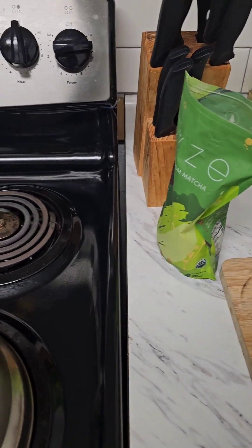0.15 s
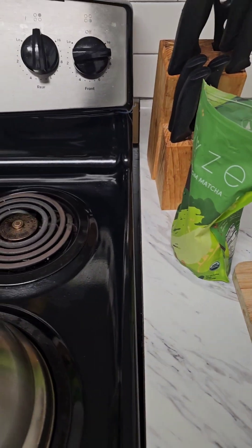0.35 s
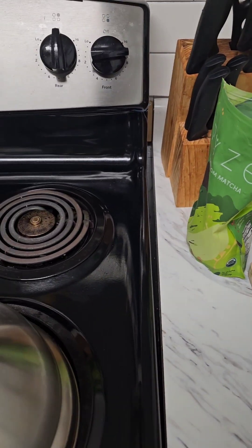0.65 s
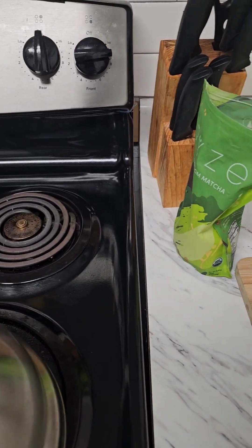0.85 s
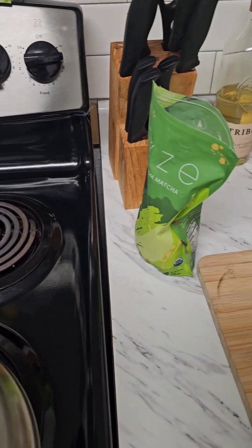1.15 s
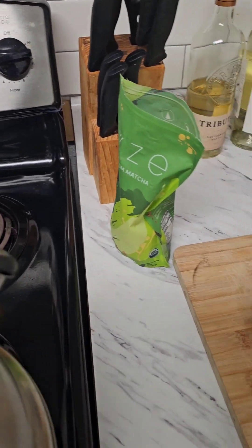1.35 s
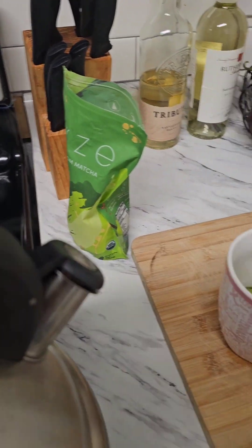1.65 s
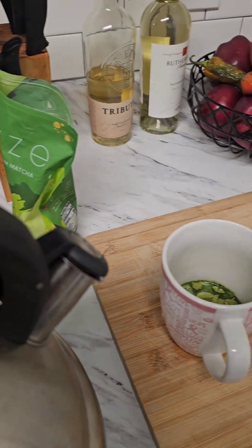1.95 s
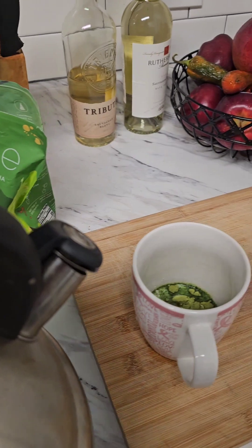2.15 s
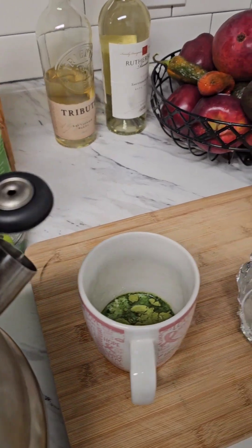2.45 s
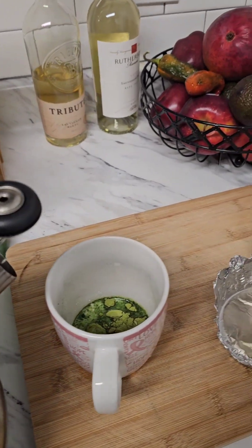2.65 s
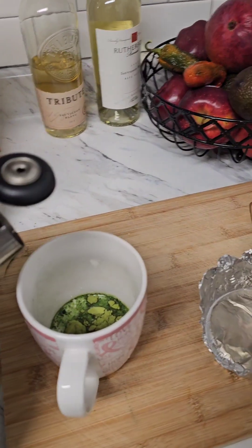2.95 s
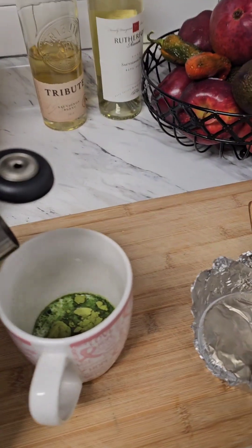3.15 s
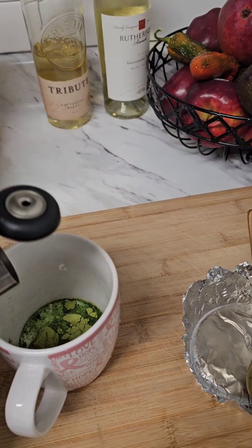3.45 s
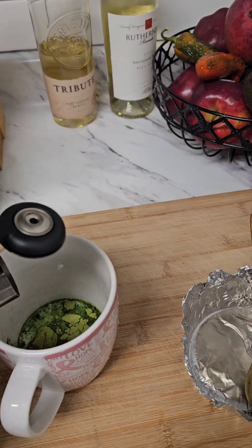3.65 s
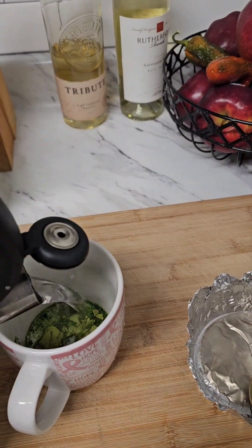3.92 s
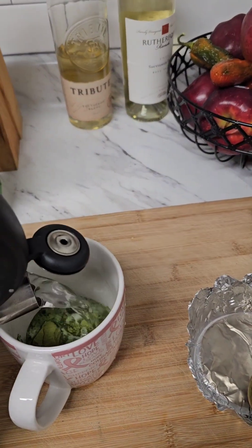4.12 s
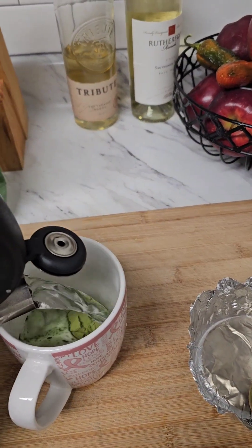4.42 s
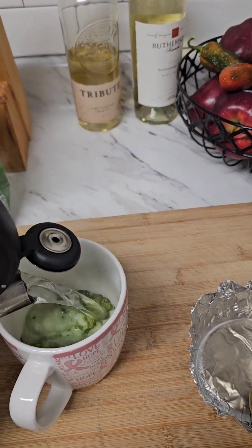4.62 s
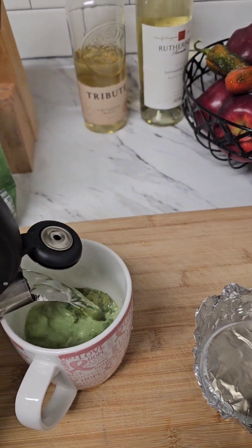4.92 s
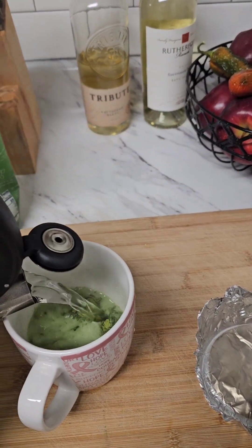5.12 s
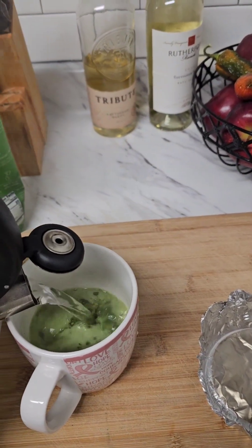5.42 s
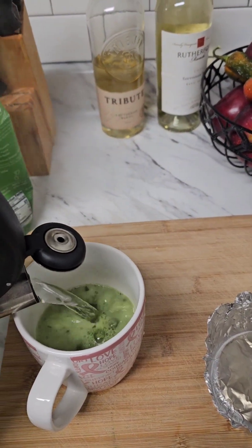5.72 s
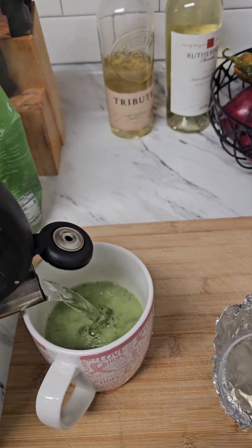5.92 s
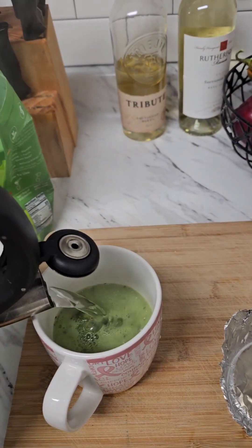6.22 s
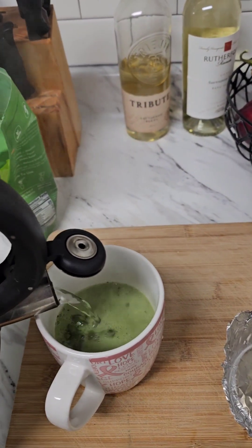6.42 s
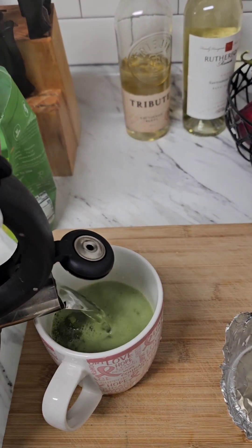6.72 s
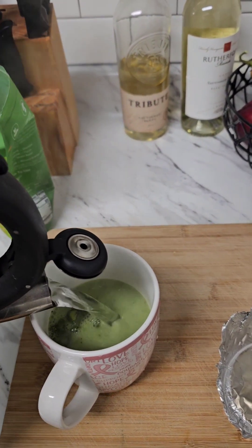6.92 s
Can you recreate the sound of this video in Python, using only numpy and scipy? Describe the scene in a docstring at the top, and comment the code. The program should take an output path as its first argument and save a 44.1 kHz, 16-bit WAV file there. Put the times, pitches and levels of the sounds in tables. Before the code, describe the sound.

A close stereo recording in a small, slightly reflective kitchen with faint low room noise. From 0 to 0.65 s a kettle whistles shrilly around 2.7 kHz with bright overtones, wobbling and breaking into fuzz over steam hiss and boiling rumble. From about 0.5 s, as it is lifted, the pitch sags, steam puffs, and the tone abruptly stops; a wet sputter slides down and vanishes by 0.95 s. The boil collapses to a soft simmer. Between 1.2 and 3.5 s water sloshes dully inside the kettle, while thin metallic burner ticks come irregularly from 1.4 s. At 2.26 s the spout cap cracks open sharply, rebounds and rings the kettle, with a short sizzle. After a lull, water enters the ceramic mug at 3.9 s with gulps and plinks. A dull, low knock lands at 4.2 s. The gentle pour burbles unevenly, its hollow resonance rising, softer toward 7 s.

```python
"""A kettle whistles at the boil in a small kitchen, then sputters out as it is lifted off the stove.
Steam is filtered noise; the whistle is sines that break up into fuzzy noise bands. As the rumble dies
away, water sloshes as short swelling tones with spits of noise, and a burner ticks as ringing metal.
The spout cap snaps open: sharp noise bursts, and the kettle rings. Then hot water runs into a mug with
splashes of noise bursts and chirping sines, a stream of chirping bubbles that ring the mug, and one
dull knock of low tones."""
import sys
import numpy as np
from scipy import signal
from scipy.fft import rfft, irfft, next_fast_len
from scipy.io import wavfile
from scipy.ndimage import uniform_filter1d

SR = 44100
rng = np.random.default_rng(int(sys.argv[2]) if len(sys.argv) > 2 else 0)


def inscribe(sig):
    """Save sig as 16-bit PCM at rate SR to the path in sys.argv[1].

    A 1-D sig is mono; a 2-D sig holds one channel per row.
    Samples are clipped to [-1, 1] before scaling.
    """
    pcm = np.round(np.clip(np.atleast_2d(sig).T, -1, 1) * 32767)
    wavfile.write(sys.argv[1], SR, pcm.astype(np.int16))


N = 311787
T = np.arange(N) / SR  # time of every sample in seconds


def amp(db):
    """Turns decibels into a plain factor."""
    return 10 ** (np.asarray(db) / 20)


def evened(x):
    """Scales a sound to an average (rms) strength of 1."""
    return x / np.sqrt(np.mean(x ** 2) + 1e-20)


def peaked(x, size=176):
    """Scales a blow so that its loudest few milliseconds have rms 1."""
    power = np.atleast_2d(x ** 2).mean(0)
    return x / np.sqrt(uniform_filter1d(power, size).max())


def curve(rows):
    """The columns of a table, joined by straight lines in time."""
    s, *columns = np.transpose(rows)
    return [np.interp(T, s, column) for column in columns]


def read(points, hz):
    """Reads a table of (Hz, value) at any frequency, evenly by musical pitch."""
    f, value = np.transpose(points)
    return np.interp(np.log(hz + 1), np.log(f + 1), value)


def add(mix, s, sound):
    """Adds a sound into the mix, starting at s seconds."""
    part = mix[..., round(s * SR):][..., :sound.shape[-1]]
    part += sound[..., :part.shape[-1]]


def pan(db):
    """Makes the left side louder than the right by db."""
    return amp([[db / 2], [-db / 2]])


def bump(s, half_s):
    """A smooth swell of height 1 around the time s."""
    return np.exp(-((T - s) / half_s) ** 2)


def since(s):
    """Seconds gone by after the time s, zero before."""
    return np.maximum(T - s, 0)


def wander(rate):
    """Smooth chance of rms 1 with this many turns a second."""
    steps = np.interp(T * rate, np.arange(N), rng.standard_normal(N))
    return evened(uniform_filter1d(steps, max(int(SR / rate), 1)))


def colour(x, points, size=4096):
    """A filter with the given spectrum that never sounds ahead of its input."""
    log_gain = read(points, abs(np.fft.fftfreq(size, 1 / SR))) * np.log(10) / 20
    taps = np.fft.ifft(np.exp(np.conj(signal.hilbert(log_gain)))).real[:size // 2]
    return signal.oaconvolve(x, taps[None], axes=1)[:, :x.shape[1]]


# How alike diffuse sound is on the left and right.
# Each row: frequency in Hz, likeness from 0 (unrelated) to 1 (the same).
LIKENESS = [(100, 0.93), (300, .9), (600, .55), (1200, 0), (4000, 0)]


def diffuse(size):
    """White noise on two sides: alike in the bass, unrelated in the treble."""
    a, b = rfft(rng.standard_normal((2, next_fast_len(2 * size) // 2 + 2)))
    same = np.clip(read(LIKENESS, np.linspace(0, SR / 2, len(a))), 0, 1)
    mid, side = a * np.sqrt((1 + same) / 2), b * np.sqrt((1 - same) / 2)
    return irfft([mid + side, mid - side])[:, :size]


def resonate(x, hz, width):
    """A steep resonance that follows hz: two equal stages, each with this width in Hz."""
    turn = np.exp(2j * np.pi * np.cumsum(hz * np.ones(N)) / SR)
    r = np.exp(-np.pi * width / SR)
    # shift the pitch down to zero, smooth, and shift back up
    smooth = signal.lfilter([(1 - r) ** 2], [1, -2 * r, r * r], x / turn)
    return (turn * smooth).real


def ring(modes):
    """Dying sines of a struck body, with the deep bass below about 65 Hz filtered away."""
    t = T[:SR // 2]
    sines = np.zeros(len(t))
    for k, (hz, db, t60) in enumerate(modes):
        sines += amp(db - 60 * t / t60) * np.sin(2 * np.pi * hz * t) * (-1) ** k
    return signal.sosfilt(signal.butter(2, 65, "high", fs=SR, output="sos"), sines)


# How long the kitchen's echoes last.
# Each row: frequency in Hz, time to fall by 60 dB in seconds.
ECHO_TIMES = [(100, 0.62), (300, 0.26), (1000, 0.052), (3000, 0.35), (7000, 0.19), (16000, 0.18)]


def room(x, wet_db, size=22050):
    """Direct sound plus the kitchen's reflections, each band dying at its own speed."""
    hz, t, bands = signal.stft(diffuse(size), SR, nperseg=256)
    fading = bands * amp(-60 * t / read(ECHO_TIMES, hz)[:, None])
    tail = signal.istft(fading, SR)[1][:, :size]
    tail *= np.clip((T[:size] - .002) / 0.001, 0, 1)  # no reflection in the first 2 ms
    wet = signal.fftconvolve(np.atleast_2d(x), tail / np.linalg.norm(tail[0]), axes=1)[:, :N]
    return (x + amp(wet_db) * wet) / np.sqrt(1 + amp(wet_db) ** 2)


def bubble(hz, cycles, rise, size=3000):
    """A bubble rings for some cycles and climbs in pitch as it nears the surface."""
    age = T[:size] * hz / cycles
    turns = np.cumsum(hz * (1 + rise * np.minimum(age, 4))) / SR
    return np.sin(2 * np.pi * turns) * np.exp(-age) * (1 - np.exp(-turns))


def gulp(hz):
    """A large bubble pinches off with a soft plop and rings."""
    t = T[:3000]
    burst = rng.standard_normal((1, len(t))) * np.exp(-t / 0.0045)
    plop = colour(burst, [(300, -8), (800, 1.5), (1800, -5), (4000, -20)])[0]
    return peaked(peaked(bubble(hz, cycles=4.6, rise=0.021)) + peaked(plop))


def fizz(low_hz, high_hz, per_s, spread_db, cycles, count=28):
    """A cloud of bubbles of many sizes, arriving in clumps."""
    out, clumps = np.zeros((2, N)), amp(5.5 * wander(40))
    sizes = amp(spread_db * np.minimum(rng.exponential(1, N), 3.5))
    angle = rng.random(N) * np.pi / 2  # each bubble has its own place between left and right
    places = sizes * np.array([np.cos(angle), np.sin(angle)])
    for hz in np.geomspace(low_hz, high_hz, count):
        births = rng.random(N) < clumps * per_s / count / SR
        out += signal.oaconvolve(births * places, bubble(hz, cycles, rise=0.025)[None], axes=1)[:, :N]
    return evened(out)


# Tone colour of the faint steady background noise.
# Each row: frequency in Hz, relative strength in dB per Hz.
BACKGROUND = [(25, -1.5), (60, 4), (110, -0.5), (300, -14), (600, -21), (1000, -18), (1700, -22),
              (2300, -29), (3500, -32), (8000, -36.5), (16000, -38)]


def background():
    """A faint, steady noise, strongest in the bass: filtered white noise."""
    return pan(.8) * amp(-65.5) * evened(colour(diffuse(N), BACKGROUND))


# Low rumble of collapsing bubbles.
# Each row: frequency in Hz, relative strength in dB per Hz.
RUMBLE_COLOUR = [(60, -14), (110, -5.5), (150, 4.5), (205, -6.5), (290, 5), (360, -9.5), (520, -5.5),
                 (800, -10.5), (1100, -37), (2200, -32), (4000, -47)]
# Sizzle of wet metal.
# Each row: frequency in Hz, relative strength in dB per Hz.
SIZZLE_COLOUR = [(500, -7.5), (1500, -5), (3000, 5), (4000, -5.5), (5200, -1.5), (6500, 2), (7800, 6),
                 (10000, -8.5), (11700, -3), (13000, -9), (16000, -17)]
# Resonances of the air in the kettle, stirred by steam.
# Each row: pitch in Hz, width in Hz, relative level in dB.
KETTLE_AIR = [(295, 13, -3.5), (476, 110, -6), (645, 110, -19.5), (916, 10, -15), (1330, 60, -16.5),
              (1434, 17, -15), (1640, 96, -17), (2140, 150, -14.5), (4070, 250, -19.5)]
# Steam flares up at the boil, as the cap opens and as tipped water meets the hot wall.
# Each row: time of the peak in seconds, rise in seconds, level in dB, later fade in dB per second.
STEAM_FLARES = [(.65, 1, -59.5, 7), (2.38, .06, -56.5, 58.5), (4.5, 0.65, -68.5, 12)]
LIFT_S, STOP_S = .48, .648  # the kettle leaves the heat; the jet lets go
ROLL_DB, EMBER_DB = -41.5, -52  # rumble of the rolling boil, and of the simmer left after it
SETTLE_DB_PER_S, COOL_DB_PER_S = 65.5, 5.5  # the boil collapses fast, the simmer dies slowly
PLOPS_DB, PLOPS_FADE_DB_PER_S = -63.5, 5.5  # bursting bubbles thin out off the heat
HOLLOW_DB, HOLLOW_FOLLOW = -31.5, 0.47  # the air hums at this level plus a share of the steam's dB


def simmer():
    """Collapsing bubbles rumble and plop in the cooling kettle; steam makes its air hum, and wet metal sizzles."""
    off_heat = since(STOP_S)
    rolling = amp(ROLL_DB - SETTLE_DB_PER_S * off_heat)
    embers = amp(EMBER_DB - COOL_DB_PER_S * off_heat)
    rumble = evened(colour(diffuse(N), RUMBLE_COLOUR)) * np.hypot(rolling, embers) * amp(2.2 * wander(40))

    flares = [amp(db - fade * since(s)) * np.where(T < s, bump(s, rise_s), 1)
              for s, rise_s, db, fade in STEAM_FLARES]
    steam_db = 20 * np.log10(np.linalg.norm(flares, axis=0) + 1e-9)
    crackling = diffuse(N) * amp(2 * wander(720))
    sizzle = evened(colour(crackling, SIZZLE_COLOUR)) * amp(steam_db + 0.58 * wander(32))

    drive = diffuse(N)
    hum = evened(sum(amp(db) * evened(resonate(drive, hz, width)) for hz, width, db in KETTLE_AIR))
    hollow = hum * amp(HOLLOW_DB + HOLLOW_FOLLOW * steam_db)

    plops = fizz(low_hz=780.0, high_hz=3830, per_s=680, spread_db=11.0, cycles=11, count=14)
    plops = plops * amp(PLOPS_DB - PLOPS_FADE_DB_PER_S * off_heat)
    return pan(-1.3) * rumble + pan(1.5) * hollow + pan(.8) * sizzle + room(plops, wet_db=1.5)


# Ticks of the cooling burner.
# Each row: time in seconds, level in dB before the common trim in burner().
BURNER_TICKS = [(1.3656, -45.5), (1.641, -38.5), (1.8719, -39.5), (1.9654, -52.5), (2.1196, -40),
                (2.4093, -39), (2.6497, -50.5), (2.8007, -40.5), (3.3043, -43), (4.282, -41.5)]
# Tone colour of the short rattle in each tick.
# Each row: frequency in Hz, relative strength in dB per Hz.
TICK_COLOUR = [(900, -1), (2500, -7.5), (3600, -6.5), (5000, 0), (5400, 0.5), (6000, -3.5), (7500, 1),
               (9800, 2), (10500, -20), (12000, 0.5), (15500, -8.5)]


def burner():
    """The coil slips on its support; the thin ping arrives mostly by way of the walls."""
    out, t = np.zeros((2, N)), T[:SR // 2]
    for s, db in BURNER_TICKS:
        rattle = colour(diffuse(len(t)) * np.exp(-t / 0.011), TICK_COLOUR)
        ping = ring([(4950, -20.5, .16), (5400, -15, 0.16), (9800, -13.5, 0.0997)])
        add(out, s - .001, amp(db - 2.5) * (peaked(rattle) + ping))
    return pan(.5) * room(out, wet_db=6.0)


# Surges of water against the kettle's wall.
# Each row: time in seconds, level in dB, main pitch in Hz, level of the bubble it traps in dB.
SURGES = [(1.206, -37, 254, -54.5), (1.3, -45, 264, -49.5), (1.365, -43.5, 291, -52.5),
          (1.931, -47, 286.3, -57), (2.024, -43.5, 217, -53.5), (2.106, -49, 167, -63),
          (2.52, -47, 179, -68), (2.711, -48.5, 143.3, -61.5), (3.011, -48, 174.3, -67.5),
          (3.12, -49, 173, -60.5), (3.465, -49.5, 174, -70)]
TRAPPED_HZ = 600  # starting pitch of those bubbles


def sloshes():
    """Each surge swells softly, wakes the air in the kettle, traps a bubble and spits on the hot wall."""
    out, spit, t = np.zeros(N), np.zeros((2, N)), T[:SR // 4]
    swell = t / .011 * np.exp(-t / 0.015)
    spit_colour = [(400, 14.5), (900, -18), (3000, -10), (8000, -16.0), (16000, -25.5)]  # Hz, dB
    for s, db, hz, bubble_db in SURGES:
        surge = np.sin(2 * np.pi * hz * t) + amp(0.5) * np.sin(2 * np.pi * 300 * t)
        add(out, s - .004, amp(db) * peaked(surge * swell))
        add(out, s + 0.0014, amp(bubble_db) * gulp(TRAPPED_HZ))
        add(spit, s, amp(db - 11.5) * peaked(colour(diffuse(len(t)) * swell, spit_colour)))
    return room(out, wet_db=-5.5) + amp(4.5) * spit


# Ringing tones of the knocked board.
# Each row: pitch in Hz, relative level in dB, time to fall by 60 dB in seconds.
BOARD_TONES = [(97, -2, .19), (145, -6.5, .22), (185, -12, .15), (285, -9, .15), (371, -7, .16),
               (462, -6.5, .36), (533, -8, .18), (700, -8, .07), (850, -9, .07), (1440, -14, .08)]
KNOCK_S, KNOCK_DB = 4.2125, -30.5


def knock():
    """A soft, heavy bump: the board rings low, with no click."""
    out = np.zeros(N)
    add(out, KNOCK_S, amp(KNOCK_DB) * peaked(ring(BOARD_TONES)))
    return pan(-.5) * room(out, wet_db=-7)


# The spout cap hits its stop and rebounds.
# Each row: time in seconds, level in dB before the common trim in cap().
CAP_SNAPS = [(2.2581, -20), (2.2615, -4), (2.2778, -8)]
# Tone colour of each crack.
# Each row: frequency in Hz, relative strength in dB per Hz.
CRACK_COLOUR = [(150, -6), (500, 5.5), (850, 1.5), (1050, -7), (1400, -0.5), (2000, -3), (3200, -2.5),
                (5500, -1.5), (7300, -2.5), (9500, -14), (12000, -8), (16000, -14.5)]
# Ringing tones of the kettle's body and air.
# Each row: pitch in Hz, level in dB, time to fall by 60 dB in seconds.
KETTLE_TONES = [(131, -17, .22), (168, -19, .15), (284, -20, .17), (312, -26, .12), (437, -28, .17),
                (598, -28, .15), (642, -30, .24), (827, -31, .15), (877, -35, .2), (917, -35, .2),
                (1510, -42, .26), (2875, -35, .15), (3015, -32, .19), (4530, -35, .2), (5225, -33, .19),
                (5895, -33, .15), (7203, -31, .19)]


def cap():
    """The sprung cap cracks against its stop and sets the whole kettle ringing."""
    crack, body, t = np.zeros((2, N)), np.zeros(N), T[:SR // 10]
    fall = np.exp(-t / .0019) + amp(-16) * np.exp(-t / .012)  # a sharp blow, then a short buzz of the hinge
    for s, db in CAP_SNAPS:
        add(crack, s, amp(db - 4.5) * peaked(colour(diffuse(len(t)) * fall, CRACK_COLOUR)))
    soft_start = 1 - np.exp(-T[:SR // 2] / .003)
    add(body, CAP_SNAPS[1][0], ring(KETTLE_TONES) * soft_start)
    return pan(-1) * room(crack, wet_db=-5.5) + pan(-2.5) * room(amp(1.0) * body, wet_db=-14)


POUR_S = 3.9  # the stream reaches the mug
EMPTY_HZ, FILL_PER_S = 775, .128  # pitch of the air in the empty mug; share of it displaced each second


def mug_air(s):
    """The column of air above the water shortens as the mug fills, so its pitch climbs."""
    return EMPTY_HZ / np.clip(1 - FILL_PER_S * np.maximum(s - POUR_S, 0), .1, 1)


# The loudest splashes in the mug; splashes() trims all these levels alike.
# Each row: time in seconds, gulp in dB, plink in dB, plink pitch in Hz, spray in dB.
MUG_SPLASHES = [(3.9, -49.5, -62, 3630, -58), (3.963, -69, -46.5, 4000, -51.5),
                (4.019, -46, -60, 3690, -51), (4.037, -44, -65, 2510, -72), (4.721, -59, -53.5, 6220, -51),
                (4.798, -65.5, -47.5, 5400, -78), (4.829, -49, -59, 6060, -59),
                (4.857, -50, -59, 6380, -49), (5.117, -54.5, -82, 6440, -61),
                (5.275, -49.5, -62, 2722, -69), (5.383, -47.5, -60.5, 3890, -69),
                (5.595, -55, -61.5, 2880, -80.5), (5.63, -56, -56.5, 3200, -85),
                (6.014, -56.5, -61, 2754, -60.5), (6.221, -61.5, -64.5, 3770, -85),
                (6.285, -56.5, -60, 5310, -59), (6.455, -70.5, -57.5, 3830, -88.5),
                (6.493, -62, -59, 3700, -87), (6.52, -70, -62, 5200, -86), (6.695, -58, -82, 3800, -90)]
# droplets fall back after a splash: dB against its plink, longest delay, scatter of pitch (log)
DROPLETS_DB, FALL_S, SIZE_SPREAD = -11.5, .07, 0.26
# each splash leaves a cloud of bubbles: dB against its table level, time to die down
CHURN_DB, CHURN_S = -21, 0.042


def splashes(count=3):
    """Each splash gulps at the pitch of the mug's air, plinks and throws spray; a few droplets fall back."""
    low, high, t = np.zeros(N), np.zeros((2, N)), T[:3000]
    spray_colour = [(800, -3), (3000, -2.0), (8000, -1), (16000, -10.5)]  # Hz, dB
    spray_shape = (1 - np.exp(-t / 0.0017)) * np.exp(-t / 0.0082)
    for s, gulp_db, plink_db, hz, spray_db in MUG_SPLASHES:
        add(low, s + 0.0011, amp(gulp_db) * gulp(mug_air(s)))
        spray = colour(diffuse(len(t)) * spray_shape, spray_colour)
        plink = bubble(hz, cycles=2.7, rise=0.011)
        add(high, s, amp(plink_db) * peaked(plink) + amp(spray_db) * peaked(spray))
        for late, width, weak in rng.random((count, 3)):
            droplet = bubble(hz * np.exp(SIZE_SPREAD * (2 * width - 1)), cycles=8.3, rise=0.025)
            add(high, s + late * FALL_S, amp(plink_db + DROPLETS_DB - 8.9 * weak) * peaked(droplet))
    return pan(1) * room(amp(-3.5) * low, wet_db=-5) + pan(1.5) * room(amp(-3.5) * high, wet_db=-5)


def churn(column):
    """Clouds of bubbles that follow the splashes, as strong as one of their level columns."""
    return sum(amp(row[column] + CHURN_DB) * (T > row[0]) * np.exp(-since(row[0]) / CHURN_S)
               for row in MUG_SPLASHES)


# Strength of the stream over time.
# Each row: time in seconds, level in dB before the trims in pour().
STREAM = [(3.87, -100), (3.97, -69), (4.8, -69.5), (5.05, -76), (5.4, -66.5), (5.9, -71.5), (6.35, -69.5),
          (6.6, -85.5), (6.9, -75.5)]
# Resonances of the mug's ceramic wall.
# Each row: pitch in Hz, width in Hz, relative level in dB.
MUG_WALL = [(2210, 110, 2), (2800, 230, -5.5), (3860, 260, 1), (5430, 110, -5)]
SPRAY_DB, FOAM_DB_PER_S = -5.5, 1  # level of the fine spray against the stream; rising foam muffles it


def pour():
    """The stream drags air under: a burble of large bubbles and a spray of tiny ones, both ringing the mug."""
    flow_db = curve(STREAM)[0]
    spray_db = flow_db + SPRAY_DB - FOAM_DB_PER_S * since(POUR_S)
    burble = fizz(low_hz=700, high_hz=2400, per_s=1000, spread_db=4.5, cycles=6, count=20)
    spray = fizz(low_hz=2400, high_hz=7000, per_s=1300, spread_db=4.8, cycles=7, count=20)
    # the churn follows the gulps (column 1) and the plinks (column 2)
    water = burble * (amp(flow_db - 3) + churn(column=1)) + spray * (amp(spray_db) + churn(column=2))
    air = amp(11.5) * resonate(water, mug_air(T), 210)
    wall = amp(8.5) * sum(amp(db) * resonate(water, hz, width) for hz, width, db in MUG_WALL)
    return pan(2) * room(water + air + wall, wet_db=-4.5)


# Tone colour of the hissing steam.
# Each row: frequency in Hz, relative strength in dB per Hz.
STEAM_COLOUR = [(400, -5.5), (800, -4), (1300, -3.5), (2400, -8), (3200, -19.5), (3900, -20.5), (5000, 4.5),
                (7500, 0.5), (9400, 1.5), (10200, -12), (11500, -3), (13500, -7.5), (16000, -12.5)]
# Pipe resonances of the spout.
# Each row: pitch in Hz, width in Hz, relative level in dB.
SPOUT_PIPE = [(1650, 44, -6.5), (3490, 110, -10), (4400, 270, -0.5), (7150, 600, 0.5)]
# Moments when steam breaks through.
# Each row: time in seconds, half length in seconds, level in dB.
STEAM_PUFFS = [(.495, .04, -39), (0.679, .02, -37.5)]
# Wet flutter in the spout: its loudness.
# Each row: time in seconds, level in dB.
SPUTTER_LEVEL = [(0, -58.5), (.4, -61), (.5, -41), (.7, -41.5), (.95, -86)]
# Wet flutter in the spout: its sinking pitch.
# Each row: time in seconds, pitch in Hz.
SPUTTER_PITCH = [(0, 1767), (.55, 1598), (.65, 1357), (.74, 1030), (.95, 859)]
JET_DB, JET_FADE_DB_PER_S = -38, 316  # steady hiss, and its fall once the jet lets go


def steam():
    """The jet hisses, rings the spout, and sputters lower and lower as the pressure goes."""
    pipe = evened(sum(amp(db) * evened(resonate(rng.standard_normal(N), hz, width))
                      for hz, width, db in SPOUT_PIPE))
    force = amp(JET_DB - JET_FADE_DB_PER_S * since(STOP_S))
    force = force + sum(amp(db) * bump(s, half_s) for s, half_s, db in STEAM_PUFFS)
    jet = (evened(colour(diffuse(N), STEAM_COLOUR)) + amp(-4.5) * pipe) * force
    sputter = evened(resonate(diffuse(N), curve(SPUTTER_PITCH)[0], 420)) * amp(curve(SPUTTER_LEVEL)[0])
    flutter = wander(120)
    return room(jet * amp(1.2 * flutter) + sputter * amp(3.5 * flutter), wet_db=-4)


# Slugs of water in the spout tug at the tone.
# Each row: time in seconds, half length in seconds, pull on the pitch in Hz, added unsteadiness 0-1.
WATER_SLUGS = [(.065, .012, 100, 0), (.155, .022, -200, .5), (.215, .02, -40, .25), (.27, .022, 60, .2),
               (.315, .02, -130, .35), (.442, .024, -310, .25), (.474, .016, 230, .7),
               (.54, .045, -40, .35)]
WHISTLE_HZ, UNSTEADY = 2678, .34  # pitch, and flutter of the tone (0-1), at full boil
SAG_HZ_PER_S, SAG_DB_PER_S = 3200, 17.5  # once lifted, pitch and level sink with the pressure


def blowing_state():
    """Pitch and unsteadiness of the whistle: tugged by slugs of water, sagging once lifted."""
    lifted = np.minimum(since(LIFT_S), STOP_S - LIFT_S)
    hz, unsteady = WHISTLE_HZ - SAG_HZ_PER_S * lifted, UNSTEADY
    for s, half_s, pull_hz, shake in WATER_SLUGS:
        hz = hz + pull_hz * bump(s, half_s)
        unsteady = unsteady + shake * bump(s, half_s)
    return hz, np.clip(unsteady, 0, 1)


# The whistle's tone and its overtones.
# Each row: multiple of the main pitch, level in dB before the cap colours it.
WHISTLE_TONES = [(1, -0.5), (2, 5), (3, -6), (4, -23), (5, -24.5)]
# What the cap's cavity lets through: bands near 2.7 and 5.3 kHz, and the high treble.
# Each row: frequency in Hz, gain in dB.
CAP_CAVITY = [(1500, -24), (2050, -5), (2350, 0), (3000, 0), (3250, -22), (3900, -28), (4400, -7),
              (4800, 0), (5750, 0), (6150, -8), (6900, 2), (16000, 0)]
WHISTLE_DB, CHOKE_DB = -23.5, -3.5  # level before choking; level change of a fully unsteady tone


def whistle():
    """The steam jet locks to the cap's cavity; water in the spout shakes the tone into a fuzzy band."""
    hz, unsteady = blowing_state()
    shaking = .035 * wander(300) + .012 * wander(90)
    turns = np.cumsum(hz * (1 + unsteady * shaking)) / SR
    tone = np.zeros(N)
    for k, db in WHISTLE_TONES:
        broken = unsteady ** (3.2 / k)  # share of fuzz: high overtones break up first
        fuzz = evened(resonate(rng.standard_normal(N), k * hz, 70 + 150 * k))
        clean = np.sqrt(2) * np.sin(2 * np.pi * k * turns) * amp(2.5 * wander(130))
        tone += amp(db) * (np.sqrt(1 - broken) * clean + np.sqrt(broken) * fuzz)
    blowing = np.clip((STOP_S - T) / .015, 0, 1)  # the jet lets go
    level_db = WHISTLE_DB + CHOKE_DB * unsteady - SAG_DB_PER_S * since(LIFT_S)
    tone = evened(colour(tone[None], CAP_CAVITY))[0] * blowing * amp(level_db + 1.8 * wander(260))
    # the left side hears it first; stove top and wall echo it a few ms late, so that it beats with itself
    left = [(0, 1), (.0021, .3), (.0063, .35)]  # delay in seconds, gain
    right = [(.00007, .95), (.0029, .3), (.0078, .35)]
    heard = np.array([sum(gain * np.interp(T - late, T, tone, left=0) for late, gain in side)
                      for side in (left, right)])
    return room(heard, wet_db=-8.5)


def scene():
    """All the sounds of the kettle, the mug and the background together."""
    kettle = simmer() + burner() + sloshes() + cap() + steam() + whistle()
    mug = knock() + splashes() + pour()
    return background() + kettle + mug


def record(dry):
    """The sharpest peak is rounded by a slight overload; then the highest treble is cut."""
    rounded = dry / (1 + (dry / .85) ** 6) ** (1 / 6)
    treble_cut = signal.firwin(511, 16000, window=("kaiser", 9), fs=SR)  # edge in Hz
    return signal.oaconvolve(rounded, treble_cut[None], "same")


dry = scene()
out = record(dry)
inscribe(out)
```